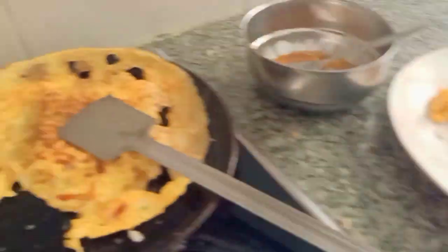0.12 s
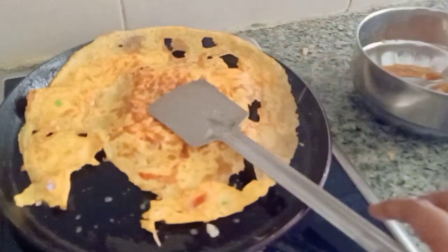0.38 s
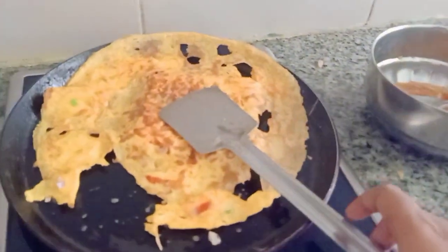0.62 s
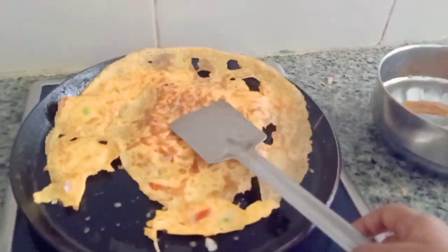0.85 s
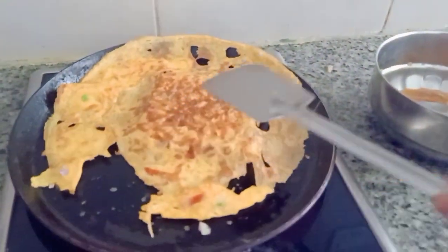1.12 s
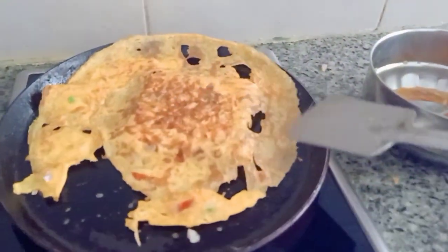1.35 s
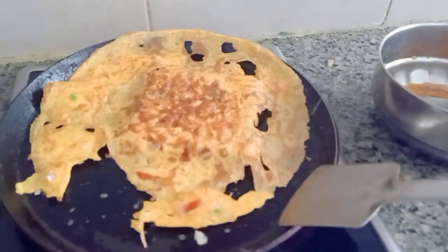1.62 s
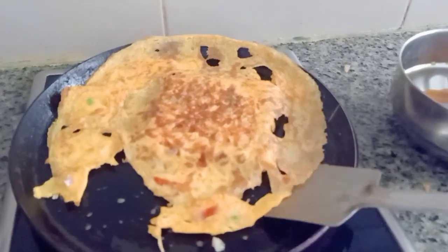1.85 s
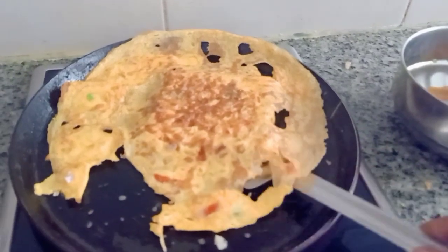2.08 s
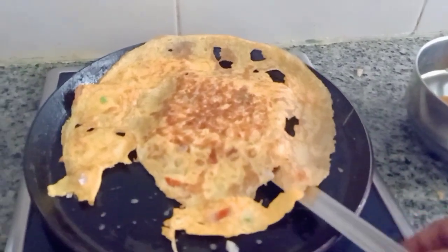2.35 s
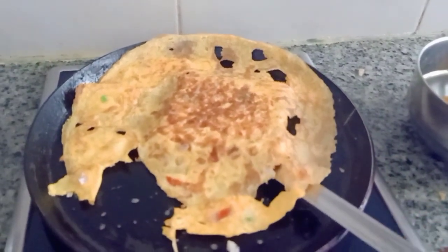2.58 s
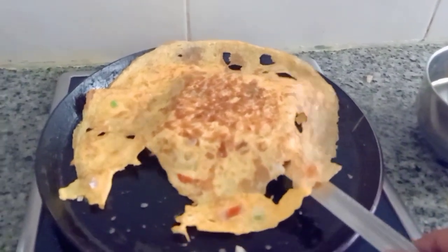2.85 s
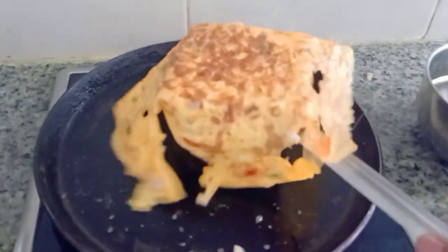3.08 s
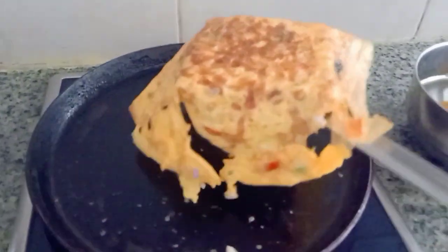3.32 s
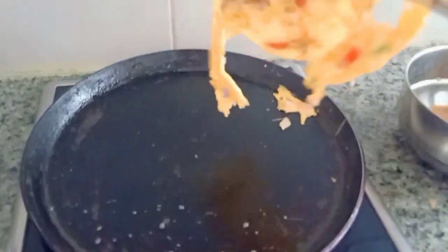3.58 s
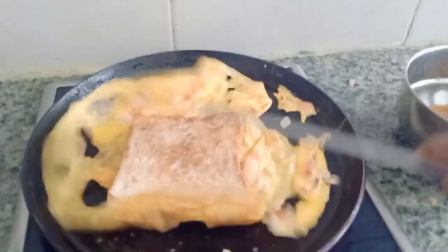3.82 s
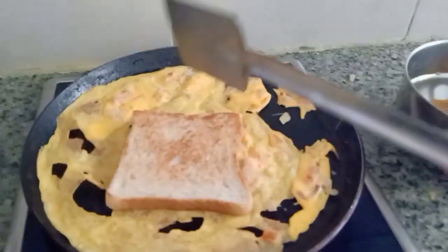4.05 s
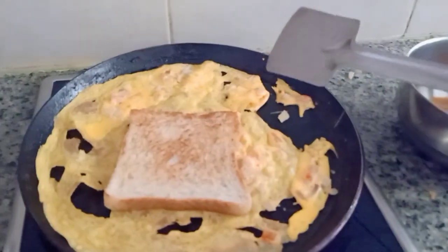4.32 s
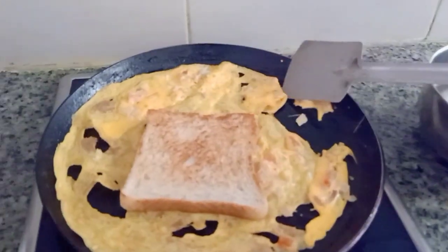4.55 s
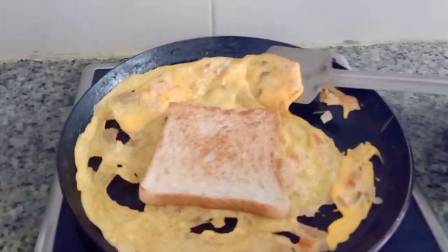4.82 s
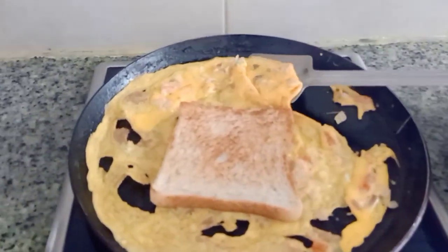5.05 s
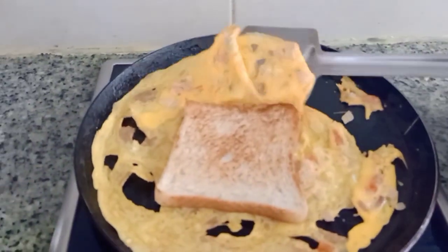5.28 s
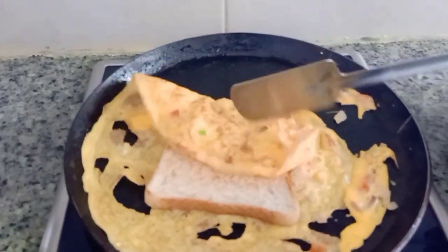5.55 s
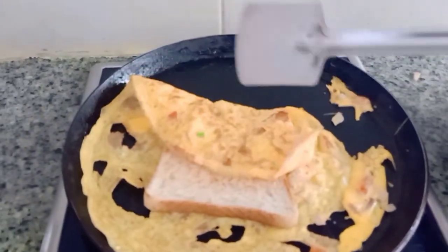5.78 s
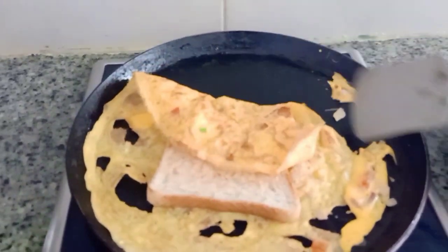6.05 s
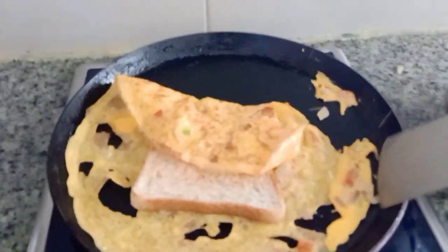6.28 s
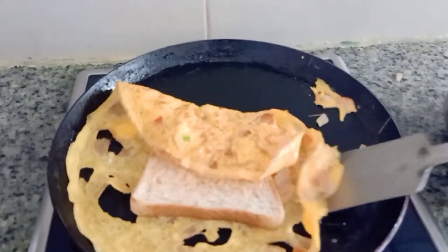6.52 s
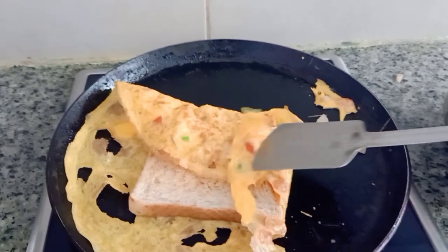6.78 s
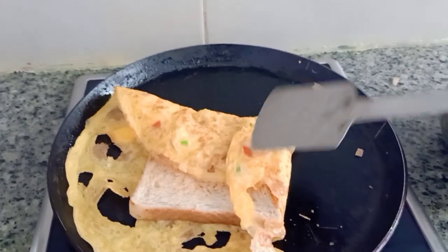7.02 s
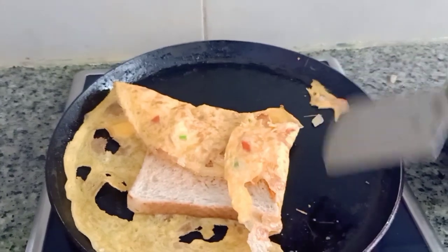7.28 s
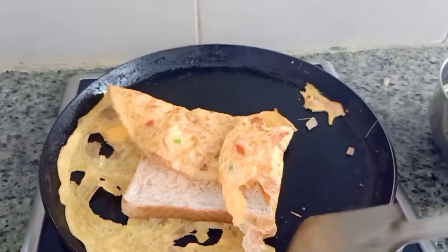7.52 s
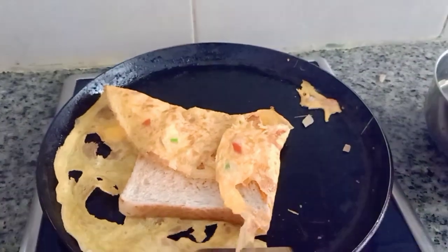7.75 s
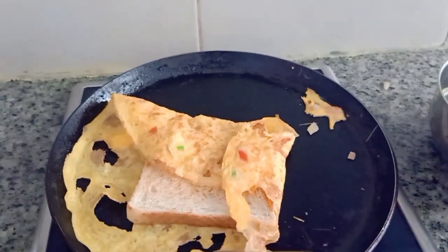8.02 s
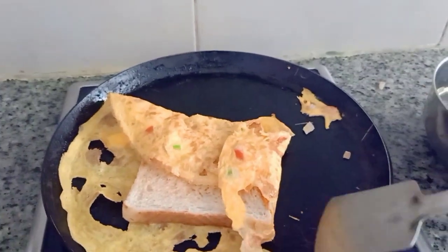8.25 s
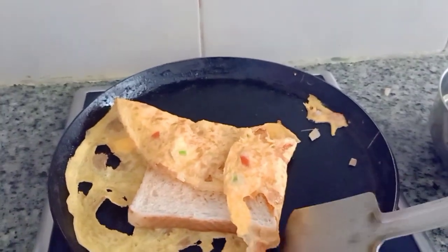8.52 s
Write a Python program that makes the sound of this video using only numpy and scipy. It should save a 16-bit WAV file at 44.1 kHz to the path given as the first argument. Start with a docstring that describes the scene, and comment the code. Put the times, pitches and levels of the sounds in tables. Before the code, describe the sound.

A small tiled kitchen, heard close to the stove in stereo with short hard echoes. From 0 s the sizzle is very faint, with a few tiny fat ticks near 0.3 s and a light tap at 0.9. At 1.5 s a steel spatula clacks in quick succession on the iron pan, rumbling it, then scrapes grittily until 2.2, with a softer rub at 2.4. Frying almost vanishes around 3.3. At 3.7 s the omelette slaps down, a short wet spatter over a heavy low rumble. Sizzling returns stronger, with scrapes and a small clank at 4.4-4.8 and sharp spits around 5. A double clank rocks the pan at 6.1; spits crackle from 6.9 to 8. More knocks and scrapes come at 7.3-7.5 and 8.1, then the loudest, ringing clank at 8.35 and a last scrape. Soft room air and a faint, intermittent low engine drone, rising near the end, lie beneath.

```python
"""In a tiled kitchen an omelette sizzles in an iron pan: many tiny bubbles tick and die away.
A steel spatula clacks on the pan (noise bursts and dying tones) and scrapes it (grit noise through resonances).
The omelette is flipped and slaps down in spattering bursts; the pan rocks on the stove as a lumpy low rumble.
A distant engine drones now and then as a low tone with its octave, and soft room air lies under it all."""
import sys
import numpy as np
from scipy import signal
from scipy.io import wavfile
from scipy.ndimage import uniform_filter1d

SR = 44100
rng = np.random.default_rng(int(sys.argv[2]) if len(sys.argv) > 2 else 0)


def field_ratio(decibels):
    """Amplitude ratio for a level in dB (20 dB per decade); scalars and array-likes work."""
    return 10 ** (np.asarray(decibels, dtype=float) / 20)


def persist_wave(psi):
    """Save psi, clipped to +-1, as 16-bit WAV."""
    counts = np.round(np.clip(psi, -1, 1) * 32767).astype(np.int16)
    wavfile.write(sys.argv[1], SR, np.atleast_2d(counts).T)


N = 380508  # length of the scene in samples
PORTS_S = 0.00032  # time sound takes from one microphone to the other [s]

# pitches of the iron pan: (pitch [Hz])
PAN_HZ = [246, 324, 424, 522, 899, 1045, 1340, 1491, 1535, 1728, 1885, 1990, 2073, 2380, 2880]
# tones of the iron pan: (pitch [Hz], level [dB], time to fade by 60 dB when ringing freely [s])
PAN_MODES = list(zip(PAN_HZ, [-7, -5.0, -10.0, -12.5, -1.5, -8.5, -11, -5.5, -7, -20, -14.5, -12.5, -5, -5, -10.5],
             [0.095, 0.12, 0.11, 0.26, 0.06, 0.093, 0.49, 0.067, 0.3, 0.23, 0.2, 0.32, 0.036, 0.076, 0.14]))
# pitches of the steel blade: (pitch [Hz])
BLADE_HZ = [1950, 2540, 2600, 2750, 3238, 3338, 3700, 4005, 4151, 4690, 4755, 5250, 5495, 5850, 6390, 6997,
            8168]
# tones of the steel blade: (pitch [Hz], level [dB], time to fade by 60 dB when ringing freely [s])
BLADE_MODES = list(zip(BLADE_HZ, [-18.5, 3.5, -15.0, -3.0, -11.0, -22.5, -10, -2.5, -10, -14, -2.5, -15.0, -18, -8.0, -17.0, -25.0, -16],
               [0.82, 0.028, 0.16, 0.1, 0.27, 0.57, 0.12, 0.056, 0.11, 0.19, 0.036, 0.24, 0.049, 0.025, 0.28, 0.56, 0.2]))
# low resonances of pan and stove grate: (pitch [Hz], width [Hz], level [dB])
STOVE_MODES = [(102.8, 15, 4), (120.6, 20, 4.5), (195, 20, -13.5), (248.9, 21, 4.5), (355, 130, -8.5)]


def evened(x):
    """Scales a sound to an rms (average strength) of 1."""
    return x / np.sqrt(np.mean(x ** 2) + 1e-20)


def read(points, hz):
    """Reads a spectrum curve on a log-frequency axis."""
    f, value = np.transpose(points)
    return np.interp(np.log(hz + 1), np.log(f + 1), value)


def columns(rows, t):
    """Reads every column of a curve at times t."""
    s, *values = np.transpose(rows)
    return [np.interp(t, s, v) for v in values]


def add(mix, s, sound):
    """Mixes a sound in at time s, cut off at the end of the mix."""
    part = mix[..., round(s * SR):][..., :sound.shape[-1]]
    part += sound[..., :part.shape[-1]]


def resonate(x, hz, width):
    """Two-pole resonance of peak gain near 1: a body that answers best at one pitch."""
    r = np.exp(-np.pi * width / SR)
    w = 2 * np.pi * min(hz, SR / 2.2) / SR
    return signal.lfilter([(1 - r) * 2 * np.sin(w)], [1, -2 * r * np.cos(w), r * r], x)


def coloured(x, points):
    """Causal filter with the given spectrum."""
    log_gain = np.log(field_ratio(read(points, abs(np.fft.fftfreq(8192, 1 / SR)))))
    # the Hilbert transform finds the phase that makes the filter answer as early as it can
    spectrum = np.exp(np.conj(signal.hilbert(log_gain)))
    colour = np.fft.ifft(spectrum).real[:2048]
    return signal.oaconvolve(np.atleast_2d(x), colour[None], axes=1)[:, :N]


def burst(contact, t60):
    """Uneven noise that rises over the contact time and dies away, peak 1."""
    t = np.arange(SR // 6) / SR
    noise = rng.standard_normal(len(t)) * rng.exponential(1, len(t))
    x = noise * np.minimum(t / contact, 1) * field_ratio(-60 * t / t60)
    return x / abs(x).max()


def bubble(hz, cycles, tick_db):
    """A steam bubble bursts: a sharp tick and a few dying cycles that rise in pitch."""
    t = np.arange(400) / SR
    pop = np.sin(2 * np.pi * hz * t * (1 + 20 * t)) * np.exp(-t * hz / cycles)
    pop[:2] += field_ratio(tick_db) * np.array([1, -0.55])
    return pop


def sizzle():
    """Many small bubbles burst at random, a few are large; the loudest spits of fat are listed."""
    # frying: (time [s], level [dB], boost of the low-pitched bubbles [dB])
    frying = [(0.0, -69.5, -4.5), (0.33, -68.5, -5), (1.3, -69.5, -9.5), (1.9, -60.5, 4.5),
              (2.28, -69, -5.5), (2.83, -67.5, -4), (3.17, -74, -4), (3.32, -100, -6), (3.55, -72.5, 7),
              (3.7, -61.5, 1.5), (3.89, -55, -1), (4.28, -61, -0.5), (4.61, -54.5, 2.5), (4.85, -58, -3.5),
              (5.9, -63.5, -0.5), (6.25, -59, -6.5), (7.0, -64.5, -1), (7.4, -62, -3.5),
              (8.63, -61.5, -0.5)]
    # the loudest spits of fat: (time [s], level [dB], bubble pitch [Hz], first tick over bubble [dB])
    spits = [(0.2748, -44, 5600, -3), (0.313, -38.5, 5260, 5), (0.3448, -49.5, 5190, 20.5),
             (0.3653, -42.5, 5400, 5), (1.1114, -43, 2410, -5), (1.3034, -48, 2890, 0),
             (2.2997, -46, 5230, 0), (2.9807, -46.5, 1690, 14.5), (3.114, -51.5, 6140, 18.5),
             (3.1468, -48.5, 4020, 19.5), (3.208, -47, 2530, 17), (3.2514, -38.5, 6450, 18.5),
             (3.52, -44, 1170, 7), (3.5363, -42, 2080, 0), (4.163, -32, 2860, -10),
             (4.2263, -36.5, 2260, 1), (4.4412, -37, 2870, 0), (4.9482, -39, 1560, 6),
             (4.9754, -32.5, 1620, 15), (5.0627, -28, 3000, 1), (5.2017, -39.5, 2370, 10),
             (5.2832, -35.5, 1540, 5), (5.3493, -34.5, 966, -7), (5.5992, -37.5, 1410, -1),
             (5.648, -42, 1470, 13), (5.7234, -36, 2790, 9.5), (5.8686, -41, 1630, 11),
             (6.4644, -43, 5460, 17.5), (6.8902, -37, 5230, -2), (7.0607, -33.5, 6050, -14),
             (7.111, -33, 5400, 5), (7.1785, -34, 4940, 2), (7.2178, -39, 2700, -2), (7.65, -39, 2100, 9),
             (7.674, -37.5, 2330, -2), (7.7662, -36.5, 1460, -6), (7.8331, -36.5, 2240, 13.5),
             (7.8665, -29, 5440, -3), (7.9057, -37, 1440, 11), (8.0056, -33, 2600, 1),
             (8.0736, -45, 2370, 13), (8.303, -37, 4950, 3)]
    left_db_per_octave = -1  # the big, low-pitched bubbles burst further left

    level_db, big_db = columns(frying, np.arange(N) / SR)
    happens = rng.random(N) < 1500 / SR  # about 1500 bubbles a second
    size = field_ratio(4.28 * np.minimum(rng.exponential(1, N), 4.3)) * happens
    kind = rng.integers(0, 24, N)
    fizz = np.zeros((2, N))
    for k, hz in enumerate(np.geomspace(900, 14000, 24)):
        train = size * (kind == k) * (field_ratio(big_db) if k < 10 else 1)
        one_bubble = bubble(hz, 1.27, 2.5) * field_ratio(2.0 * np.log2(hz / 4000))
        grain = signal.oaconvolve(train, one_bubble)[:N]
        # each pitch has its own angle to the microphones
        delay = round(PORTS_S * SR * rng.uniform(-0.5, 0.5))
        fizz += [grain, np.roll(grain, delay)]
    out = field_ratio(level_db + 2.0) * evened(fizz)

    for s, db, hz, tick_db in spits:
        pan_db = left_db_per_octave * np.log2(hz / 5500)
        sides = field_ratio([[pan_db / 2], [-pan_db / 2]])
        add(out, s, field_ratio(db) * bubble(hz, 1.02, tick_db) * sides)
    return out


def air():
    """Smooth room noise, alike in both microphones only in the bass."""
    # spectrum of the noise: (pitch [Hz], relative level per Hz [dB])
    air_colour = [(20, -33), (50, -25), (110, 5.5), (180, -14.5), (400, -9), (1000, -16.5), (3000, -31),
                  (8000, -32.5), (16000, -26)]
    # how alike the two microphones are: (pitch [Hz], likeness [1 = same, 0 = unrelated])
    likeness = [(60, 1), (240, 0.71), (950, -0.086), (3770, -0.079), (15000, 0.13)]

    frames, hz = N // 512 + 5, np.fft.rfftfreq(2048, 1 / SR)
    a, b, c, d = rng.standard_normal((frames, 1025, 4)).T
    same = np.clip(read(likeness, hz), -1, 1)[:, None]
    left = a + 1j * b
    right = same * left + np.sqrt(1 - same ** 2) * (c + 1j * d)
    z = np.array([left, right]) * field_ratio(read(air_colour, hz))[:, None]
    noise = signal.istft(z, nperseg=2048, noverlap=1536)[1][:, :N]
    return field_ratio(-60) * evened(noise)


def rocking():
    """Lumpy noise in the low resonances of pan and stove grate; each jolt swells it, then it settles."""
    # the pan is set rocking: (time [s], level [dB], time to fade by 60 dB [s])
    jolts = [(0.2, -67, 0.89), (0.52, -62, 0.89), (1.55, -48, 2.4), (2.05, -69, 0.59), (3.68, -40.5, 1.63),
             (4.37, -49, 0.66), (4.52, -54, 0.78), (6.14, -41.5, 0.89), (6.33, -48.5, 0.61),
             (7.36, -54.5, 1.35), (8.15, -54, 1.5), (8.45, -54, 3.3)]
    rise_s, rest_db = 0.026, -67.5  # swelling time of a jolt, level between jolts

    lumps = evened(uniform_filter1d(rng.standard_normal(N), 900))
    shake = rng.standard_normal(N) * field_ratio(2.6 * lumps)
    body = sum(field_ratio(db) * resonate(resonate(shake, hz, w), hz, 2 * w) for hz, w, db in STOVE_MODES)
    power, t = np.full(N, field_ratio(rest_db) ** 2), np.arange(SR) / SR
    for s, db, t60 in jolts:
        swell = np.minimum(t / rise_s, 1) * field_ratio(db - 60 * t / t60)
        add(power, s, swell ** 2)
    return np.sqrt(power) * evened(body)


def modes(table, t):
    """Dying complex tones, one row a mode; gives their pitches too."""
    hz, db, t60 = np.transpose(table)[:, :, None]
    return hz, field_ratio(db) * np.exp((2j * np.pi * hz - np.log(1000) / t60) * t)


def ringing(hz, tones, spread_db):
    """Each blow favours other modes a little; each mode reaches the two microphones in its own phase."""
    gain, phase, side = rng.standard_normal((3, len(hz)))
    apart = np.pi * hz[:, 0] * PORTS_S * side
    weights = field_ratio(spread_db * gain) * np.exp(1j * (7 * phase + [apart, -apart]))
    ring = (weights @ tones).imag
    return ring / np.sqrt(np.mean(ring[:, :SR // 100] ** 2))  # rms 1 over the first 10 ms


def blows():
    """A dense short clank, then pan and blade ring: damped while in contact, a little lingers."""
    # blows: (time [s], pan ring [dB], blade ring [dB], thud [dB], brightness [dB per octave])
    clacks = [(0.878, -76, -45.5, -68, 16.5), (1.482, -33.5, -28.5, -38.5, -2),
              (1.4931, -29, -26.5, -39, 3.5), (1.5064, -40, -60, -64, 5), (1.5846, -42.5, -61, -40, 6),
              (2.0274, -43, -49, -51, 4), (2.0877, -41.5, -47.5, -56.5, 2), (4.3719, -52, -73, -42.5, -6),
              (4.504, -40, -40.5, -51, 2.5), (6.0566, -32, -28, -35, 4), (6.0708, -32.5, -27.5, -40, 3.5),
              (7.3056, -33.5, -33, -34, 0), (7.441, -44.5, -55, -49, 1), (8.11, -32.5, -32.5, -37, 1),
              (8.347, -24, -17.5, -37.5, -8), (8.3541, -27.5, -41, -47, -2), (8.4737, -36, -39, -42, -1.5)]
    # colour of the clank: (pitch [Hz], level [dB])
    clank_colour = [(50, -25), (200, -3.5), (600, -7), (1500, -8.5), (2600, -11), (5000, -9), (8000, -12),
                    (14000, -16)]
    clank_over_ring_db = 21
    inward_share = -1.45  # pan tilt for each dB per octave of brightness

    rings, clanks, t = np.zeros((2, N)), np.zeros((2, N)), np.arange(SR // 3) / SR
    low, high = modes(PAN_MODES[:4], t), modes(PAN_MODES[4:], t)
    blade = modes(BLADE_MODES, t)
    for s, pan_db, blade_db, thud_db, bright_db in clacks:
        force_db = max(pan_db, blade_db)
        # 60 dB fade [s] under the damping hand and food, very slightly longer for harder blows
        damp = np.clip(0.086 * field_ratio(0.01 * (force_db + 45.5)), 0.02, 1)
        # a blow near the tip wakes the high modes of the blade
        edge = blade[1] * field_ratio(bright_db * np.log2(blade[0] / 2540))
        # the tip reaches inwards, to the deeper modes of the pan
        depth = np.minimum(np.log2(high[0] / 1600), 0)
        floor = high[1] * field_ratio(inward_share * bright_db * depth)
        metal = field_ratio(pan_db) * ringing(high[0], floor, 3.7)
        metal += field_ratio(blade_db) * ringing(blade[0], edge, 3.1)
        metal *= (field_ratio(-60 * t / damp) + field_ratio(-27.5)) * np.minimum(t / 0.0026, 1)
        thud = field_ratio(thud_db) * ringing(*low, 0.97) * np.minimum(t / 0.00071, 1)
        add(rings, s - 0.001, metal + thud)
        clank = burst(0.0011, 0.42 * damp)
        sharp = field_ratio(2 * bright_db - 25) * np.diff(clank, prepend=0)  # differences lift the treble
        add(clanks, s - 0.001, field_ratio(force_db + clank_over_ring_db) * (clank + sharp))
    return rings + coloured(clanks, clank_colour)


def drone():
    """A far engine: a low rising tone and its octave, swelling and fading."""
    # engine swells: (start [s], length [s], level [dB], first pitch [Hz], last pitch [Hz])
    swells = [(1.032, 0.8, -55, 59.05, 62.8), (3.031, .6, -61.5, 57.2, 58.8), (5.55, .75, -63, 60, 61.8),
              (6.249, 1.7, -61, 61.5, 69.1), (7.7, 1.31, -60.5, 70.5, 81)]
    octave_db = -8.5
    out = np.zeros(N)
    for s, length, db, first_hz, last_hz in swells:
        hz = np.linspace(first_hz, last_hz, round(length * SR))
        angle = 2 * np.pi * np.cumsum(hz) / SR
        tone = np.sin(angle) + field_ratio(octave_db) * np.sin(2 * angle)
        swell = signal.windows.tukey(len(hz), 0.7)  # rise and fall take 70 % of the length
        add(out, s, field_ratio(db) * np.sqrt(2) * tone * swell)
    return out


def dulled(x, share):
    """One-pole low-pass: a soft contact loses its treble."""
    share = np.clip(share, 0, 0.98)
    return signal.lfilter([1 - share], [1, -share], x)


def strokes():
    """Dense grit clicks drive the pan, damped by the pressed blade; the contact point picks the modes."""
    # strokes: (start [s], length [s], pressure [dB], pan pitch favoured by the contact point [Hz],
    # blade rasp against pan squeak [dB])
    rubs = [(1.589, .13, -58.5, 1650, 1), (1.725, 0.21, -42.5, 1520, -20), (1.774, .022, -37, 1540, -20),
            (1.796, 0.02, -38.5, 1540, -20), (1.881, 0.15, -49.5, 1920, -10), (2.018, 0.071, -44, 1150, -8),
            (2.08, 0.067, -43.5, 965, -9), (2.43, .21, -49.5, 1460, -12.5), (4.497, .09, -45, 1510, -5.5),
            (4.56, 0.12, -43.5, 1255, -2.5), (4.685, 0.12, -38.5, 960, -18), (6.08, .12, -52, 1500, -6),
            (6.28, 0.2, -57, 1560, -6), (7.391, 0.14, -46.5, 1320, -5), (7.504, 0.071, -49.5, 1600, 3),
            (8.119, 0.096, -50, 1830, -9), (8.225, 0.074, -55, 1620, -3), (8.392, 0.095, -53, 1650, 1),
            (8.468, 0.049, -35, 1560, -8), (8.497, .085, -41, 1670, -6), (8.558, 0.12, -45.5, 1290, -7)]
    firm_share, light_db = 0.34, -7  # when the press is firmest; pressure at both ends
    slide_octaves_per_s = -0.25  # the contact slides inwards
    focus_db, drag_hz = 32, 18  # loss per octave off the favoured pitch; widening by the pressed blade

    out = np.zeros(N)
    for start, length, firm_db, place_hz, blade_db in rubs:
        firm, end = start + firm_share * length, start + length
        t = np.arange(start, end + 0.086, 1 / SR)
        press_db = firm_db + np.interp(t, [start, firm, end], [light_db, 0, light_db])
        near_hz = place_hz * 2 ** (slide_octaves_per_s * (t - firm))
        grit = rng.standard_normal(len(t)) * field_ratio(1.45 * rng.exponential(1, len(t)))
        slip = evened(uniform_filter1d(rng.standard_normal(len(t)), 350))  # stick and slip
        fade_in = np.clip((t - start) / min(0.014, firm - start), 0, 1)
        fade_out = np.clip((end - t) / min(0.03, end - firm), 0, 1)
        grit = evened(grit) * field_ratio(press_db + 1.6 * slip) * fade_out * fade_in
        # the rough rub under the tones
        pan = field_ratio(-29) * resonate(grit, 1400, 1500)
        for hz, db, t60 in PAN_MODES:
            loss_db = np.minimum(focus_db * abs(np.log2(hz / near_hz)), 19)
            pan += resonate(grit * field_ratio(db - loss_db), hz, 2 / t60 + drag_hz)
        blade = sum(field_ratio(db) * resonate(grit, hz, 4.0 / t60 + 15) for hz, db, t60 in BLADE_MODES)
        rasp = field_ratio(1) * blade + field_ratio(-1) * dulled(grit, 0.63)
        add(out, start, field_ratio(21.5) * pan + field_ratio(blade_db) * rasp)
    return out


def slap():
    """Wet egg hits hot iron: broad spattering bursts over a dull push."""
    # the omelette lands in three flaps: (time [s], relative spatter level [dB],
    # relative thud level [dB], time for the spatter to fade by 60 dB [s])
    flaps = [(3.6575, -38, -62, 0.059), (3.6652, -23, -34, 0.15), (3.681, -12, -34, 0.028)]
    # colour of the spatter: (pitch [Hz], level [dB])
    wet_colour = [(50, -22), (300, 1.5), (900, 2.5), (1700, -1.5), (2600, -4.5), (4000, -11.5), (6000, -10),
                  (14000, -18)]
    wet, push = np.zeros(N), np.zeros(N)
    for s, db, thud_db, t60 in flaps:
        add(wet, s - 0.002, field_ratio(db + 13.5) * burst(0.0014, t60))
        add(push, s, field_ratio(thud_db + 28.0) * burst(0.007, 4.5 * t60))
    thud = sum(field_ratio(db) * resonate(push, hz, 2 * w) for hz, w, db in STOVE_MODES[1:])
    return coloured(wet, wet_colour)[0] + thud


def kitchen(x, echo_db, tail_db):
    """Direct sound, near echoes and a tail of sparse taps, each a little apart at the two microphones."""
    # echo tail: (pitch [Hz], time to fade by 60 dB [s])
    fade_times = [(200, 0.67), (1000, 0.33), (4000, 0.41), (12000, 0.18)]
    # echoes from wall and counter: (delay [s], level before echo_db is added [dB])
    echoes = [(.0011, -6), (.0021, -7.5), (.0031, -12.5), (.0046, -5.5), (.008, -20.5), (.013, -11)]

    gap = PORTS_S * SR
    at = np.arange(400, SR - 60, 20) + rng.integers(0, 20, (SR - 441) // 20)
    taps, sign = np.zeros((2, SR)), rng.choice([-1., 1.], len(at))
    shift = np.round(gap * rng.uniform(-1, 1, len(at))).astype(int)
    np.add.at(taps[0], at, sign)
    np.add.at(taps[1], at + shift, sign)
    # each pitch of the tail dies at its own speed
    hz, t, z = signal.stft(taps, SR, nperseg=256)
    fade = field_ratio(-60 * t / read(fade_times, hz)[:, None])
    tail = signal.istft(z * fade, SR, nperseg=256)[1]
    tail *= field_ratio(tail_db) / np.linalg.norm(tail[0])
    for (s, db), side in zip(echoes, rng.uniform(-0.56, 0.62, len(echoes))):
        arrivals = [round(s * SR - side * gap), round(s * SR + side * gap)]
        tail[[0, 1], arrivals] += field_ratio(db + echo_db)
    tail[[0, 1], [0, round(gap / 6)]] += 1  # the direct sound reaches the left microphone first
    tail = tail[:, :SR // 2]
    return signal.oaconvolve(x * np.ones((2, 1)), tail, axes=1)[:, :N]


def scene():
    """Metal, slap and frying in the kitchen over the low rumble, engine and room air."""
    frying = kitchen(sizzle(), -0.26, -7.5)
    metal_and_slap = kitchen(blows() + strokes() + slap(), 0, -9)
    return frying + air() + rocking() + metal_and_slap + drone()


def roll_off(x):
    """The treble ends steeply here."""
    return signal.sosfilt(signal.butter(12, 15950, fs=SR, output="sos"), x)


def record(dry):
    """The microphone colours the whole scene."""
    # colour of the microphone: (pitch [Hz], level [dB])
    mic_colour = [(25, -46), (45, -10.5), (70, -5.5), (1000, -3.5), (2300, 4.5), (3500, 0.5), (4600, 3),
                  (5400, 9.5), (6300, 2), (7500, -5), (9500, -9.5), (11500, -7.5), (13800, -7),
                  (15500, -10), (16200, -38)]
    finished = coloured(dry, mic_colour)
    return roll_off(finished)


dry = scene()
out = record(dry)
persist_wave(out)
```